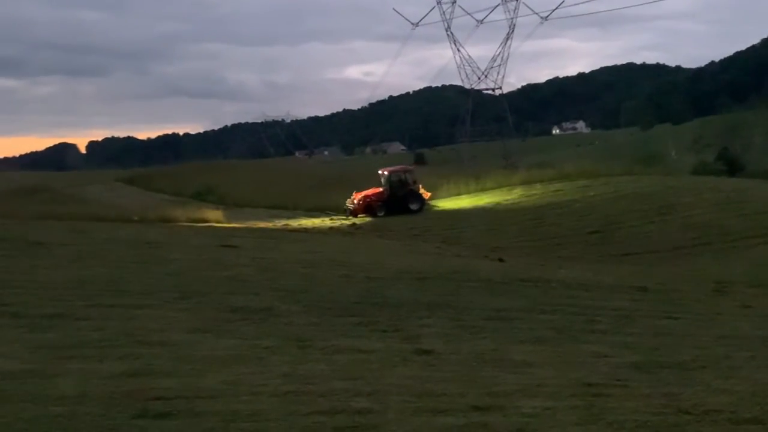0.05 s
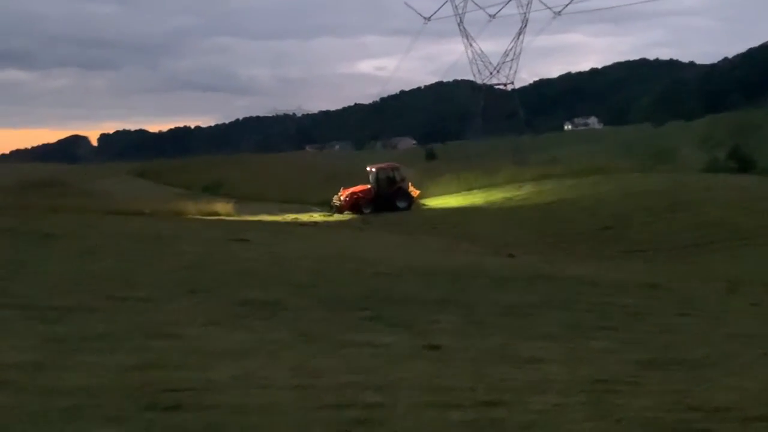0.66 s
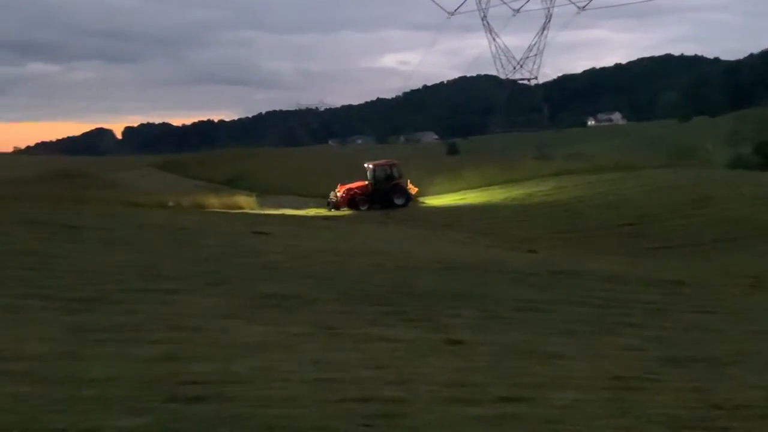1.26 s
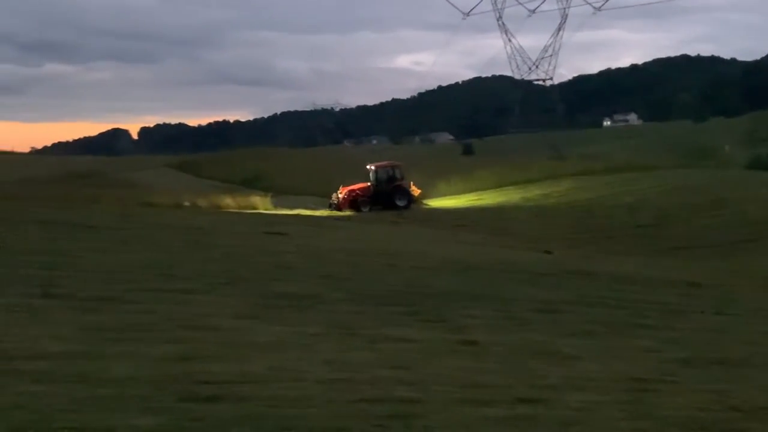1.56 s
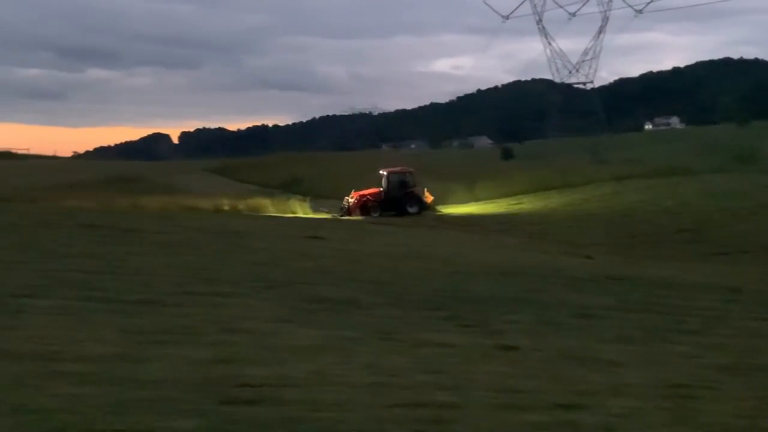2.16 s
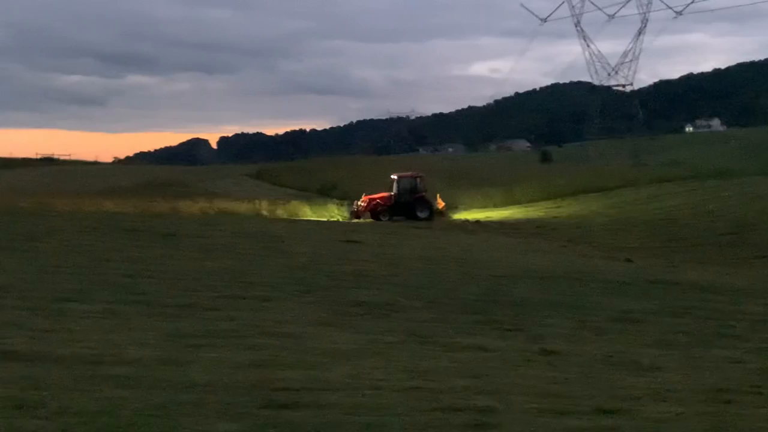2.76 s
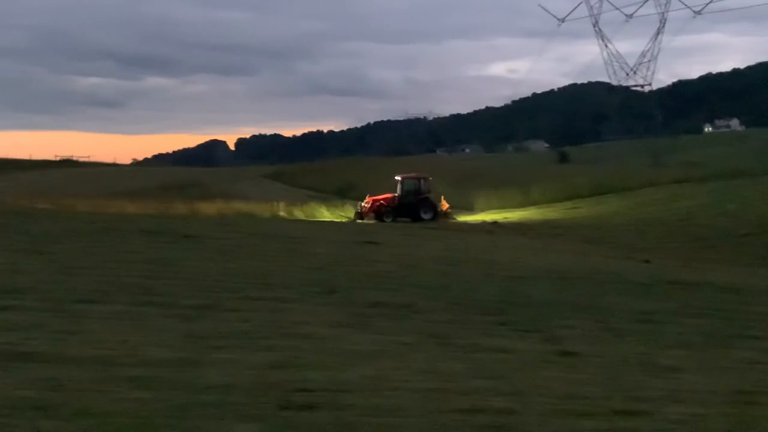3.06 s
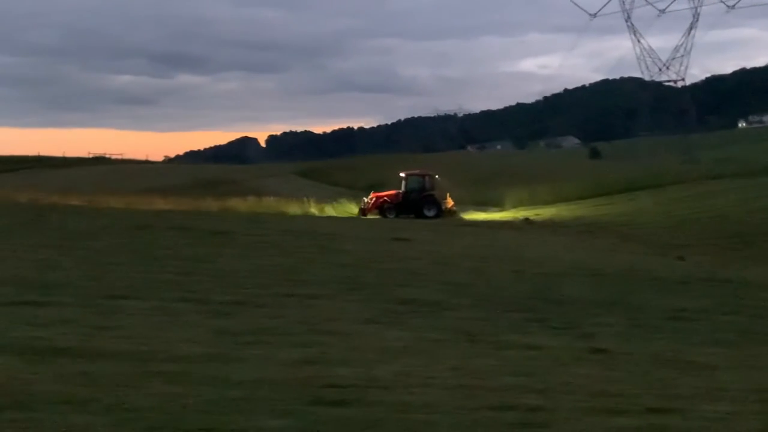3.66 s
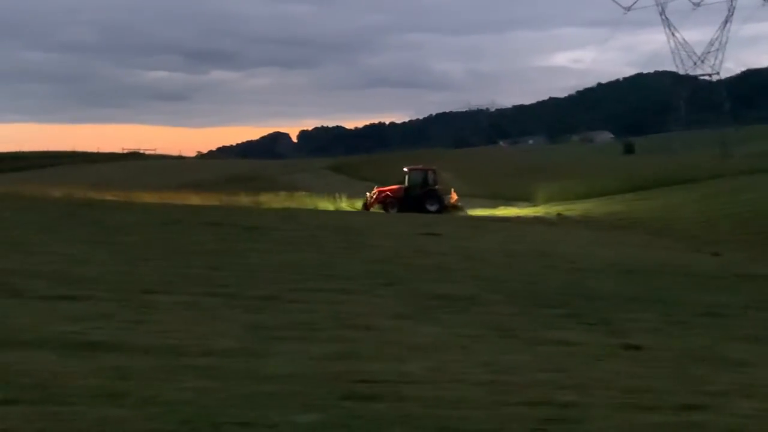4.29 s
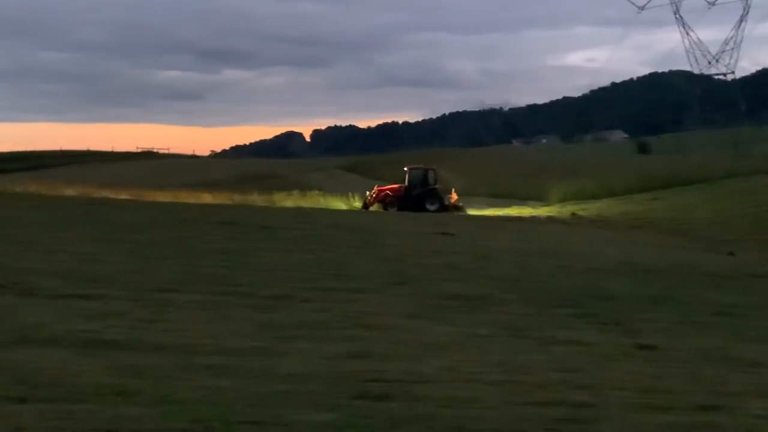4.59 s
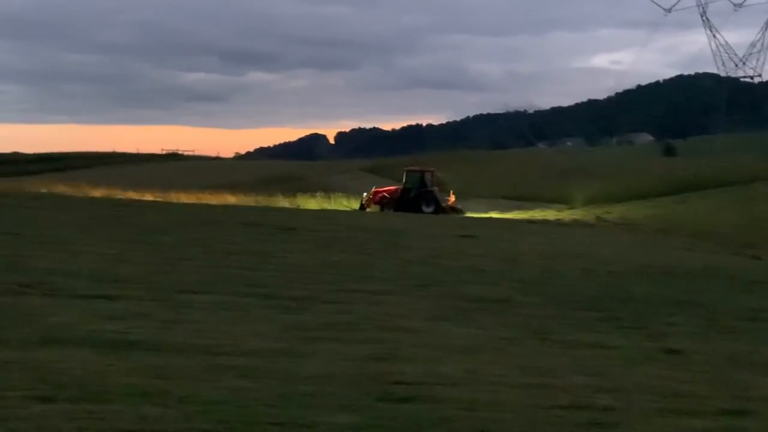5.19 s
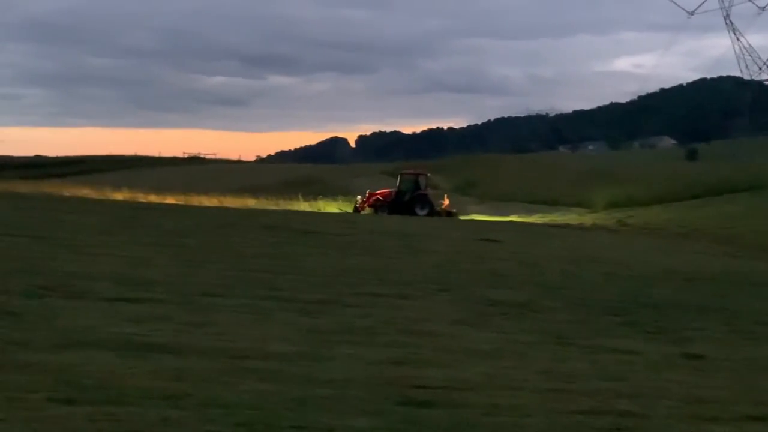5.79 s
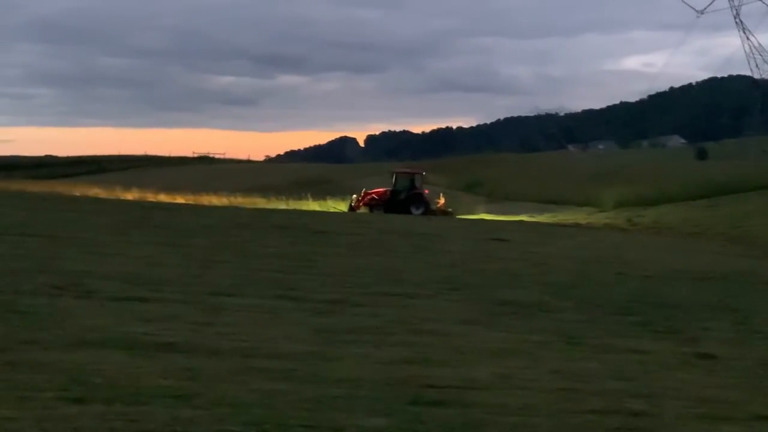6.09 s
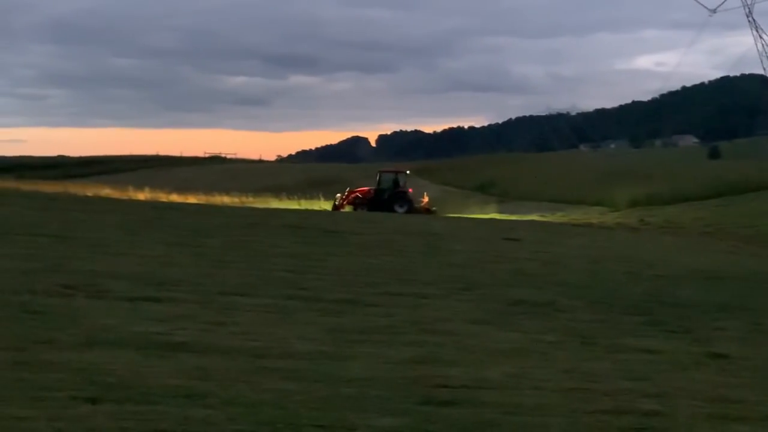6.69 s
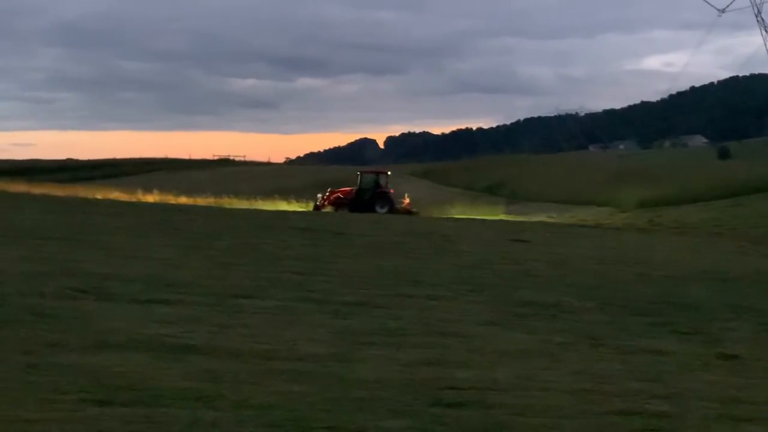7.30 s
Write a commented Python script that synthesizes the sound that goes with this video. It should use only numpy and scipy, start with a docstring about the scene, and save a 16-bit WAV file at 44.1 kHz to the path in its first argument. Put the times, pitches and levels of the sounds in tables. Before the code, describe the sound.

A diesel tractor drones and clatters as it mows a field some way off, its blades hissing through the grass.

```python
"""A diesel tractor booms and clatters at about 2400 rpm, mowing a hillside some way off.
Periodic firing sounds the exhaust, and knocks ring the block. The belt-driven blades drone against it
and slice the grass with a fluttering hiss and a rasp at each thick tuft. Gears whine, the fan roars
and loose panels rattle. The sources are directional, so the timbre shifts as the tractor turns from
nose-on to broadside; moving air makes it all waver."""
import sys
import numpy as np
from scipy import signal
from scipy.fft import rfft, irfft, next_fast_len
from scipy.io import wavfile
from scipy.ndimage import map_coordinates

SR = 44100
rng = np.random.default_rng(int(sys.argv[2]) if len(sys.argv) > 2 else 0)


def persist_wave(psi):
    """Save psi, clipped to +-1, as 16-bit WAV."""
    counts = np.round(np.clip(psi, -1, 1) * 32767).astype(np.int16)
    wavfile.write(sys.argv[1], SR, np.atleast_2d(counts).T)


N = 328545
TIME = np.arange(N) / SR
FFT_SIZE = next_fast_len(N)
HZ = np.maximum(np.arange(FFT_SIZE // 2 + 1) * SR / FFT_SIZE, 1)


def from_db(db):
    """Amplitude ratio: a factor of ten for every 20 dB."""
    return np.exp(np.asarray(db) * (np.log(10) / 20))


def unit_rms(x):
    """Normalisation to unit power."""
    return x / np.sqrt(np.mean(x ** 2) + 1e-20)


def in_time(points):
    """Linear interpolation of (seconds, value) points at every sample."""
    return np.interp(TIME, *np.transpose(points))


def over_hz(points):
    """Frequency response through (Hz, dB) points, interpolated in log frequency."""
    hz, db = np.transpose(points)
    return from_db(np.interp(np.log(HZ), np.log(hz), db))


def colour(x, gain):
    """Linear filtering: the spectrum is multiplied by a frequency response."""
    return irfft(rfft(x, FFT_SIZE) * gain, FFT_SIZE)[:N]


def bell(hz, width):
    """A steep-sided resonance curve of height 1."""
    return 1 / (1 + (1.28 * (HZ - hz) / width) ** 2) ** 2


def drift(rate_hz):
    """Slow random fluctuation of unit rms: noise through a two-pole low-pass."""
    hop, settling = 40, 2000
    pole = np.exp(-2 * np.pi * rate_hz * hop / SR)
    noise = rng.standard_normal(N // hop + settling + 2)
    slow = signal.lfilter([1], [1, -2 * pole, pole * pole], noise)[settling:]
    return np.interp(np.arange(N) / hop, np.arange(len(slow)), unit_rms(slow))


def tone(cycles, waver_db, wander_rad):
    """Scintillation: moving air modulates the level and phase of a sine."""
    amplitude = np.sqrt(2) * from_db(waver_db * drift(3.36))
    return amplitude * np.sin(2 * np.pi * (cycles + rng.random()) + wander_rad * drift(2.3))


def shaft_tones(turns, orders, broadside, waver_db, wander_rad):
    """Harmonics of rotation: tones at the nearest whole or half multiples of a shaft's speed."""
    out = np.zeros(N)
    for order, front_db, side_db in orders:
        gain = from_db(front_db + (side_db - front_db) * broadside)
        out += gain * tone(round(2 * order) / 2 * turns, waver_db, wander_rad)
    return out


def resonate(force, modes, broadside):
    """Modal radiation: a body's nose-on and broadside spectra, each at unit power, blend as it turns."""
    hz, width, front_db, side_db = np.transpose(modes)
    peaks = bell(hz[:, None], width[:, None])
    front = unit_rms(colour(force, np.sqrt(from_db(front_db) ** 2 @ peaks)))
    side = unit_rms(colour(force, np.sqrt(from_db(side_db) ** 2 @ peaks)))
    return (1 - broadside) * front + broadside * side


def beam(broadside, level_db, aim, fall_db):
    """Directivity: the gain peaks where broadside equals aim and drops by fall_db per unit away."""
    return from_db(level_db - fall_db * np.abs(broadside - aim))


def stereo_spread(x, spread_s=0.058):
    """Decorrelation: left and right differ by diffuse scatter, level and fixed phase shifts in bands."""
    # Each row: frequency in Hz, scattered level against the direct sound in dB.
    scattering = [(40, -20), (150, -22), (350, -17), (700, -12), (1400, -11.5), (2800, -15), (5500, -7.5),
                  (9000, -6.5), (14000, 1.5)]
    # Each row: frequency in Hz, left minus right level in dB.
    balance = [(60, -0.5), (110, -1.0), (200, -1.5), (380, -0.5), (700, -1.0), (1290, -1.0), (2380, -0.5),
               (4400, -3.0), (8120, 0.0), (15000, 0.0)]
    # Each row: band centre in Hz, width in Hz, phase lead of the left channel in radians.
    phase_bands = [(668, 76, -2.5), (2077, 270, 2.5), (2768, 116, 2.2), (3223, 79, 2.5), (3560, 220, 1.5),
                   (4230, 270, -1.5), (5130, 430, 3), (5420, 170, -4.5), (6200, 1700, -1.7), (7290, 870, 5)]
    echoes = rng.standard_normal(N) * np.exp(-TIME / spread_s)
    scatter = np.exp(1j * np.angle(rfft(echoes, FFT_SIZE))) * over_hz(scattering)
    lead = sum(radians * bell(hz, width) for hz, width, radians in phase_bands)
    leftward = np.sqrt(over_hz(balance)) * np.exp(0.5j * lead)
    return np.array([colour(x, (1 + scatter) * leftward), colour(x, (1 - scatter) / leftward)])


def whistle(broadside, pitch_hz=3192):
    """Forward beaming: a faint, unsteady tone, probably the turbocharger, is heard only from the front."""
    gain = beam(broadside, level_db=-58, aim=0.13, fall_db=75)
    return gain * tone(pitch_hz * TIME, waver_db=2.0, wander_rad=3.0)


def gears(crank, broadside):
    """Gear meshing: each whines at its tooth rate; two are beamed forward, two swell and fade."""
    # Each row: teeth, on-axis level in dB, aim as a broadside share, loss in dB per unit share off it.
    beamed = [(27, -54, 0.037, 19), (21, -60, 0.25, 18)]
    # Each row of both: time in seconds, level in dB.
    low_whine = [(0, -64), (.5, -57), (.68, -47.5), (.96, -56), (1.3, -55), (1.98, -49.5), (2.44, -60.5),
                 (3.05, -54.5), (3.4, -74), (7.45, -62)]
    high_whine = [(0, -54), (.15, -50), (.45, -51.5), (.8, -59), (1.15, -57), (1.45, -68), (1.75, -54.5),
                  (2.2, -58), (2.6, -72), (3.15, -54), (3.4, -61.5), (4.55, -55), (5.2, -68), (5.45, -59.5),
                  (6.7, -71), (7.45, -69)]
    faint = sum(beam(broadside, *pattern) * tone(teeth * crank, waver_db=2.0, wander_rad=0.42)
                for teeth, *pattern in beamed)
    clear = sum(from_db(in_time(levels)) * tone(teeth * crank, waver_db=1.0, wander_rad=0.12)
                for teeth, levels in ((30, low_whine), (36, high_whine)))
    return faint + clear


def fan(broadside):
    """Flow noise excites the shroud's resonances, loudest early on, while the grille faces the listener."""
    # Each row: time in seconds, level in dB.
    roar = [(0, -54), (.15, -45), (.42, -50), (.7, -66), (1.2, -66), (2, -87)]
    # Each row: frequency in Hz, width in Hz, relative levels nose-on and broadside in dB.
    shroud_modes = [(950, 320, -7, -5), (1140, 77, -5, -3), (1310, 26, 5, 3), (1380, 41, 8, -7),
                    (1470, 73, -2, 0)]
    return from_db(in_time(roar)) * resonate(rng.standard_normal(N), shroud_modes, broadside)


def guard(broadside, decay_s=0.035):
    """Impact excitation: each bump sets the mower's guard chattering with an exponential decay."""
    # Each row: start in seconds, level in dB.
    bumps = [(4.235, -65), (4.46, -57), (5.455, -44.5), (5.555, -46), (5.621, -47), (5.941, -44),
             (6.25, -49), (6.345, -45), (6.57, -47), (6.865, -47), (7.245, -45), (7.404, -45)]
    # Each row: frequency in Hz, width in Hz, relative levels nose-on and broadside in dB.
    guard_modes = [(1165, 36, -2, -8), (1215, 34, -5, -4), (1765, 41, -8, -7.5)]
    jolts = sum(from_db(db) * (TIME >= s) * np.exp(-np.abs(TIME - s) / decay_s) for s, db in bumps)
    jolt_rms = np.sqrt(np.mean(jolts ** 2))
    return jolt_rms * resonate(jolts * rng.standard_normal(N), guard_modes, broadside)


def bonnet(crank, broadside, level_db=-55.0):
    """Forced rattling: a loose panel slaps three times, unequally, in every two turns of the crank."""
    # Each row: frequency in Hz, width in Hz, relative levels nose-on and broadside in dB.
    panel_modes = [(1773, 49, 4.5, 1.5), (1875, 36, 6, 0)]
    slaps = 3 * crank / 2
    strength = np.take([1.1, 0.55, 0.8], slaps.astype(int), mode="wrap")
    force = strength * np.exp(-(slaps % 1) / 0.33) + 0.15
    gain = from_db(level_db + 0.3 * drift(10))
    return gain * resonate(rng.standard_normal(N) * force, panel_modes, broadside)


def stalks(attack_s=0.001, crack_s=0.003, crack_db=-4.5, tear_s=0.016, tear_db=-13.0):
    """Fracture: a thick stalk gives with a soft crack, then its fibres tear in a short swish."""
    # Each row: start in seconds, relative level in dB.
    breaks = [(1.735, -46), (2.2832, -42), (2.451, -41), (2.604, -35), (3.098, -44), (3.328, -38),
              (3.846, -39), (4.188, -40), (4.2335, -31), (4.628, -41), (5.157, -42), (5.2826, -38),
              (6.131, -39), (6.431, -41)]
    # Tone colour, with a narrow gap filtered out near 11.7 kHz. Each row: frequency in Hz, gain in dB.
    notched_colour = [(3000, -16), (6000, -5), (9000, 9), (10400, 4), (11700, -26), (13000, -14),
                      (15000, -17)]
    envelope = np.zeros(N)
    for start_s, db in breaks:
        start = int(start_s * SR)
        age = TIME[:min(N - start, SR // 5)]
        crack = from_db(db + crack_db) * np.exp(-age / crack_s)
        tear = from_db(db + tear_db) * np.exp(-age / tear_s)
        envelope[start:start + len(age)] += (1 - np.exp(-age / attack_s)) * (crack + tear)
    return envelope * unit_rms(colour(rng.standard_normal(N), over_hz(notched_colour)))


def tufts(rotor, chop=0.27, gain_db=-0.5):
    """Amplitude modulation: a thick tuft is torn up over several blade passes, in one gritty surge."""
    # Each row: time of the peak in seconds, length in seconds, relative level in dB.
    thick_tufts = [(1.993, 0.038, -50), (2.095, 0.033, -45.5), (2.483, 0.049, -46), (2.63, 0.064, -46.5),
                   (2.743, 0.061, -48), (2.878, 0.061, -48), (3.27, 0.063, -48), (3.54, 0.037, -51),
                   (3.595, 0.054, -50), (3.678, 0.046, -46), (3.868, 0.046, -47), (3.945, .04, -50.5),
                   (4.035, 0.032, -53), (4.126, 0.019, -53), (4.21, 0.026, -47), (4.383, 0.022, -51),
                   (4.642, 0.02, -54), (4.707, 0.028, -52), (5.02, 0.026, -47), (5.135, 0.021, -49),
                   (5.377, 0.051, -46), (5.48, 0.055, -53), (5.635, 0.13, -52), (6.018, 0.053, -53),
                   (6.115, 0.064, -48.5), (6.534, 0.057, -51), (6.624, .03, -51), (6.92, 0.024, -58),
                   (7.25, 0.037, -48.5), (7.31, 0.02, -48.5)]
    # Each row: frequency in Hz, relative spectral density in dB.
    rasp_spectrum = [(1500, -44), (2300, -7), (2850, 0), (3150, -4), (3450, 3.5), (3720, 5.5), (4150, -4),
                     (4600, 2), (5100, -14), (5900, -8.5), (7000, -17), (12000, -47)]
    surges = sum(from_db(db + gain_db) * np.exp(-2 * ((TIME - peak_s) / length_s) ** 2)
                 for peak_s, length_s, db in thick_tufts)
    grit = from_db(3.2 * drift(110))
    tearing = rng.standard_normal(N) * (1 + chop * np.cos(6 * np.pi * rotor)) * grit
    return surges * unit_rms(colour(tearing, over_hz(rasp_spectrum)))


def dull_top(x, broadside, dull_db=-10.0, open_share=0.24, edge_share=0.03, top_hz=11800):
    """Shelf filtering: the hiss's highest treble is dull for the first two seconds, then opens up."""
    top = colour(x, 1 / (1 + (top_hz / HZ) ** 20))
    dull = 0.5 - 0.5 * np.tanh((broadside - open_share) / edge_share)
    return x + top * (from_db(dull_db * dull) - 1)


def grass(rotor, broadside, chop=0.12, flutter_db=1.0, snaps_per_s=120, snap_db=15.0, gain_db=1.5):
    """Shearing noise: the hiss pulses at the blade-passing rate, and stalks snap singly at random."""
    # The hiss follows the thickness of the grass. Each row: time in seconds, relative level in dB.
    cutting = [(0.0, -59), (0.72, -61), (1.6, -58.5), (2.22, -57.5), (2.42, -53), (2.55, -56.5),
               (2.62, -51), (2.72, -55.5), (2.85, -53.5), (2.99, -56.5), (3.12, -51), (3.3, -49),
               (3.48, -56.5), (3.56, -51), (3.78, -57), (3.84, -50.5), (4.13, -53), (4.23, -50.5),
               (4.27, -52), (5.04, -55), (5.1, -51.5), (6.18, -52.5), (6.97, -56.5), (7.32, -52),
               (7.37, -57), (7.45, -53.5)]
    # Tone colour, with a narrow gap filtered out near 11.7 kHz. Each row: frequency in Hz, gain in dB.
    notched_colour = [(3000, -6), (5500, 3.5), (6800, 4.5), (7600, -0.5), (8400, 7), (9000, 6.5),
                      (10000, 3), (10800, -3), (11700, -51), (12600, -3), (15000, -11.5)]
    swish = rng.standard_normal(N) * (1 + chop * np.cos(6 * np.pi * rotor + drift(3.4)))
    snaps = (rng.random(N) < snaps_per_s / SR) * rng.standard_normal(N) * from_db(snap_db)
    flutter = from_db(flutter_db * drift(11.5))
    hiss = unit_rms(colour((swish + snaps) * flutter, over_hz(notched_colour)))
    return from_db(in_time(cutting) + gain_db) * dull_top(hiss, broadside)


def sway(x, delay_s):
    """Frequency modulation: a wandering delay bends every resonance slightly up and down."""
    positions = np.clip((TIME + delay_s * drift(1.2)) * SR, 0, N - 1)
    return map_coordinates(x, [positions], order=3, mode="nearest")


def deck(crank, broadside, shake=0.046, flutter_db=1.37, gain_db=2.0):
    """Random excitation: cuttings pelt and ring the steel deck, which shakes with the firing."""
    # Each row: time in seconds, relative level in dB.
    pelting = [(0, -53.5), (1.6, -49.5), (3.4, -48), (5.2, -51), (7.45, -53.5)]
    # Each row: frequency in Hz, width in Hz, relative levels nose-on and broadside in dB.
    deck_modes = [(2296, 200, 9.5, -1), (2414, 89, 12, 7.5), (2540, 74, 12.5, 7), (2655, 70, -6, 9.5),
                  (2834, 115, 5.5, 10), (2968, 45, 10.5, -2.5), (3044, 50, -11, 6.5), (3190, 67, 8.5, -8),
                  (3310, 72, 6.5, 4), (3470, 66, -5, 9), (3585, 41, 15.5, 0.5), (3684, 62, 11, 7.5),
                  (3840, 117, 6, 3), (4005, 120, 3, 2.5), (4300, 125, 3.5, 2.5), (4544, 130, 7, 1),
                  (4740, 180, -23, 3), (5270, 320, -1.5, -6), (5890, 130, 0, -12), (6780, 1200, -6, -6.5)]
    flutter = from_db(flutter_db * drift(16))
    force = rng.standard_normal(N) * (1 + shake * np.cos(4 * np.pi * crank)) * flutter
    ring = sway(resonate(force, deck_modes, broadside), delay_s=0.0006)
    return from_db(in_time(pelting) + gain_db) * ring


def blades(rotor, broadside, drone_gain_db=-0.87, churn_db=-44.5, side_gain_db=2.5, gust_db=1.15):
    """Blade-passing tone: three blades pump the air and leave a surging wake, louder from the side."""
    # Each row: time in seconds, relative level in dB.
    drone_levels = [(0.0, -44.5), (0.4, -33), (1.0, -37.5), (1.35, -34), (1.6, -39.5), (1.8, -32.5),
                    (1.97, -34.5), (2.03, -54), (2.18, -38), (2.45, -64), (2.62, -41.5), (3.08, -35.5),
                    (3.28, -48.5), (3.7, -34), (4.33, -65), (4.71, -32.5), (4.8, -35), (4.85, -49),
                    (4.94, -33.5), (5.1, -46), (5.27, -41), (5.39, -36), (5.95, -49.5), (6.2, -38.5),
                    (6.38, -52), (6.49, -34.5), (6.82, -52), (7.03, -36.5), (7.3, -42.5), (7.45, -43)]
    # Each row: frequency in Hz, relative spectral density in dB.
    wake_spectrum = [(20, -25), (33, -21), (48, -1), (58, 1), (86, -5), (106, 5.5), (130, -1), (148, -5.5),
                     (168, 1.5), (208, -0.5), (232, -12), (255, -15), (295, -25), (600, -74)]
    # Each row: multiple of the rotor speed, levels nose-on and broadside in dB.
    lesser_orders = [(2, -53.5, -57), (6, -52.5, -62)]
    drone_gain = from_db(in_time(drone_levels) + drone_gain_db)
    drone = drone_gain * tone(3 * rotor, waver_db=0.0, wander_rad=0.15)
    wake_gain = from_db(churn_db + side_gain_db * broadside + gust_db * drift(4.9))
    wake = wake_gain * unit_rms(colour(rng.standard_normal(N), over_hz(wake_spectrum)))
    return drone + wake + shaft_tones(rotor, lesser_orders, broadside, waver_db=3.5, wander_rad=0.14)


def clatter(crank, broadside, knock=0.17, valve=0.13, repeats=0.21, front_db=-43, side_db=-49.5):
    """Structure-borne noise: unequal knocks and valve taps ring the block, loudest through the grille."""
    # Each row: frequency in Hz, width in Hz, relative levels nose-on and broadside in dB.
    block_modes = [(393, 103, -4, 2), (483, 140, 0, -6), (574, 135, 1.5, -5.5), (784, 160, 3, -5.5),
                   (870, 260, 2, -4.5), (1039, 166, 4.5, 0), (1187, 47, 4.5, 7.5), (1287, 40, 2, 4.5),
                   (1447, 155, 4.5, -3.5), (1540, 155, 0.5, 3.5), (1997, 73, 5.5, 4.5), (2156, 85, -1, 1),
                   (2206, 120, 2, -14), (2414, 18, 1, 0.5), (2504, 29, -1.5, -1)]
    cycle = crank / 2 % 1  # a little of the rattle repeats every two turns
    grid = np.arange(1100)
    repeating = np.interp(cycle * len(grid), grid, rng.standard_normal(len(grid)))
    rattle = repeats * repeating + rng.standard_normal(N)
    cylinder_force = np.take([0.48, 0.28, 0.52, 0.96], (2 * crank).astype(int), mode="wrap")
    knocks = knock * cylinder_force * np.exp(-(2 * crank % 1) / 0.5)
    taps = valve * np.exp(-(3 * crank % 1) / 0.83)
    lope_db = -0.25 * np.cos(2 * np.pi * crank)
    force = rattle * (1 + knocks + taps) * from_db(lope_db + 0.84 * drift(19))
    gain = from_db(front_db + (side_db - front_db) * broadside ** 0.76)
    return gain * resonate(force, block_modes, broadside)


def exhaust(crank, broadside):
    """Harmonic series: four cylinders give two firings a turn, and their inequality adds half orders."""
    # Each row of both: multiple of the crank speed, levels nose-on and broadside in dB.
    booming_orders = [(2, -47, -42.5), (4, -35.5, -45.5), (4.5, -49, -45.5)]  # the firing tone and two that boom in the silencer
    lesser_orders = [(3, -56.5, -61), (3.5, -55.5, -57.5), (6, -65.5, -80), (8, -71, -79),
                     (9, -65.5, -72.5), (10, -66.5, -62), (12, -71, -77), (14, -57.5, -107), (15, -63, -72),
                     (18, -67, -71), (22, -59.5, -68), (24, -62, -67.5), (28, -63.5, -66.5),
                     (32.15, -64.5, -59.5), (34.1, -73, -76), (63, -81, -64)]
    boom = shaft_tones(crank, booming_orders, broadside, waver_db=1.35, wander_rad=0.032)
    return boom + shaft_tones(crank, lesser_orders, broadside, waver_db=2.0, wander_rad=0.35)


def scene():
    """Superposition: engine and mower, coupled by a belt, are heard together across the field."""
    # The engine sags under load. Each row: time in seconds, speed in turns per second.
    crank_speed = [(0.1, 40.65), (0.72, 40.17), (1.76, 40.12), (1.96, 39.92), (2.65, 40.19), (3.47, 39.55),
                   (4.13, 39.62), (6.38, 39.27), (7.3, 39.36)]
    # The belt slips in thick grass. Each row: time in seconds, rotor turns per crank turn.
    belt_ratio = [(0, .889), (.7, .884), (1.9, .885), (2.35, .895), (3, .885), (3.75, .869), (4.3, .876),
                  (4.75, .890), (5.3, .883), (7.45, .886)]
    # Each row: time in seconds, broadside share from 0 (nose-on) to 1 (side-on).
    heading = [(0, 0), (1.5, 0.15), (3, 0.44), (5, 0.86), (7.45, 1)]
    crank = np.cumsum(in_time(crank_speed)) / SR  # shaft angles in turns
    rotor = np.cumsum(in_time(crank_speed) * in_time(belt_ratio)) / SR
    broadside = in_time(heading)
    engine = exhaust(crank, broadside) + gears(crank, broadside) + whistle(broadside) + fan(broadside)
    rattles = clatter(crank, broadside) + bonnet(crank, broadside) + guard(broadside)
    mower = blades(rotor, broadside) + deck(crank, broadside)
    cut = grass(rotor, broadside) + tufts(rotor) + stalks()
    return stereo_spread(engine + rattles + mower + cut)


def record(dry):
    """Band limiting: an elliptic low-pass cuts the highest treble steeply."""
    cutoff_hz = 15300
    return signal.sosfilt(signal.ellip(10, 0.1, 80, cutoff_hz, fs=SR, output="sos"), dry)


dry = scene()
out = record(dry)
persist_wave(out)
```